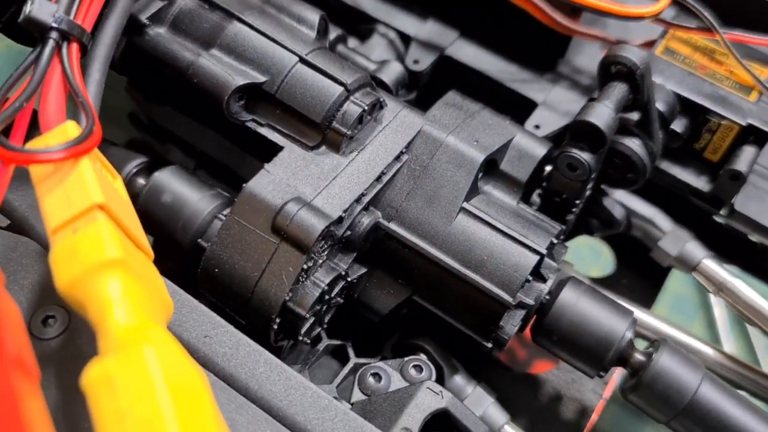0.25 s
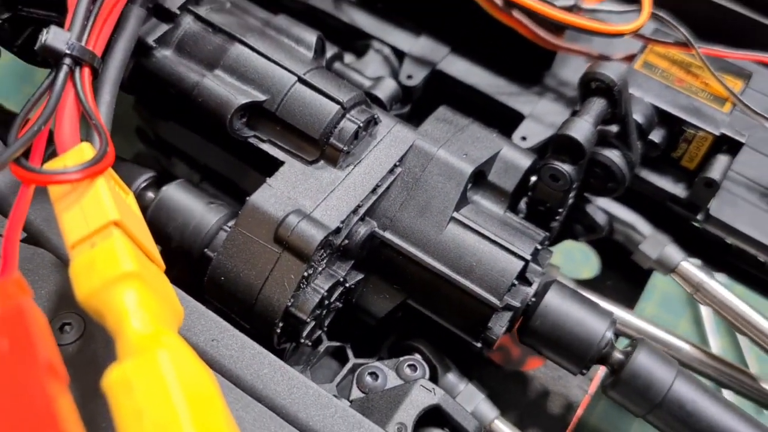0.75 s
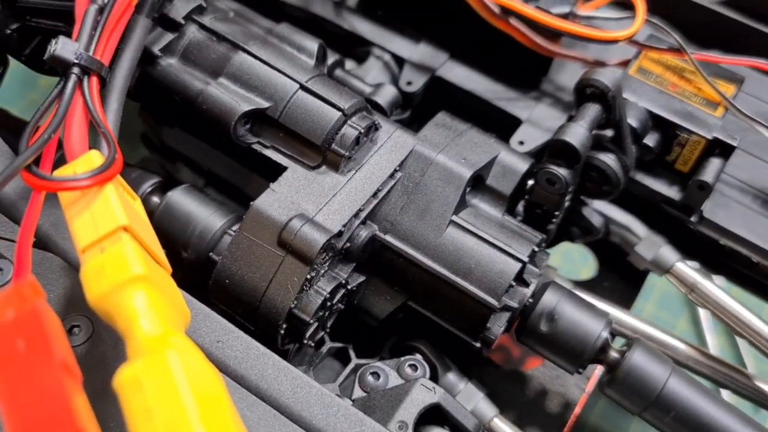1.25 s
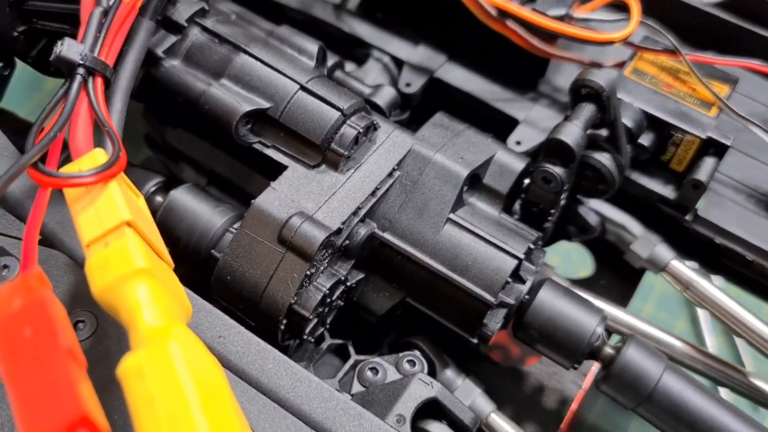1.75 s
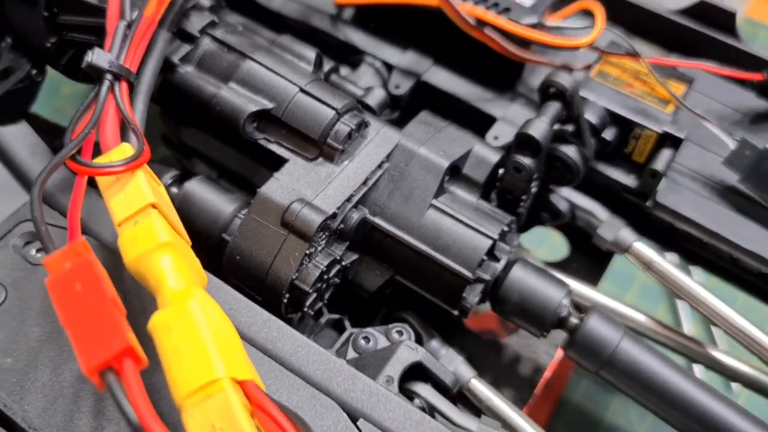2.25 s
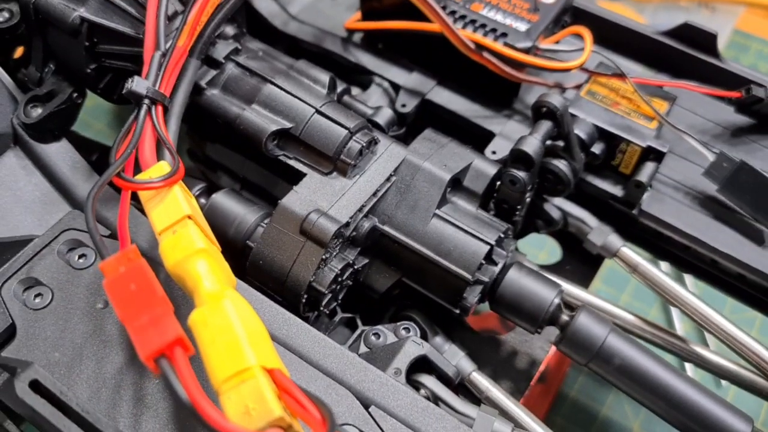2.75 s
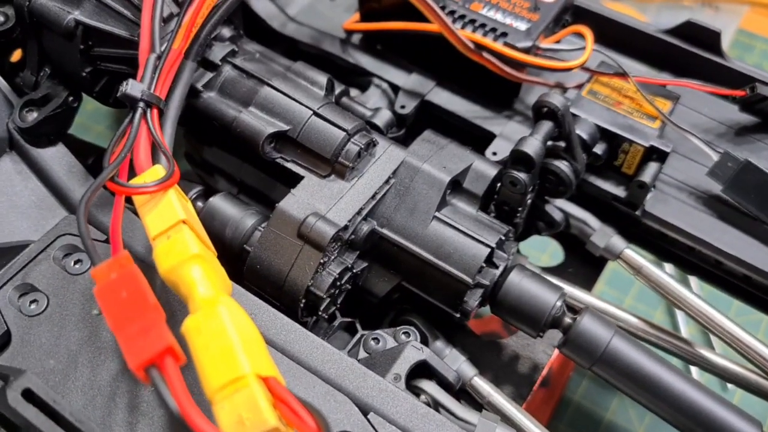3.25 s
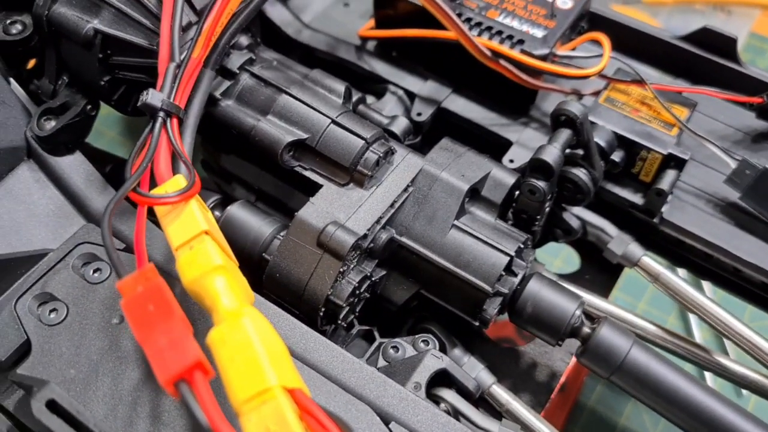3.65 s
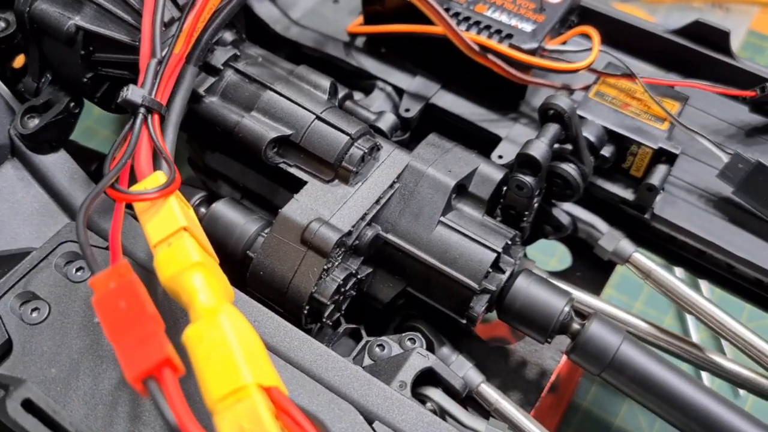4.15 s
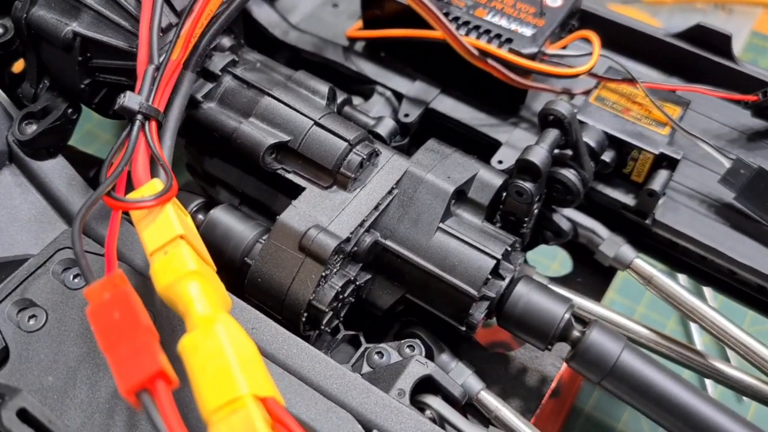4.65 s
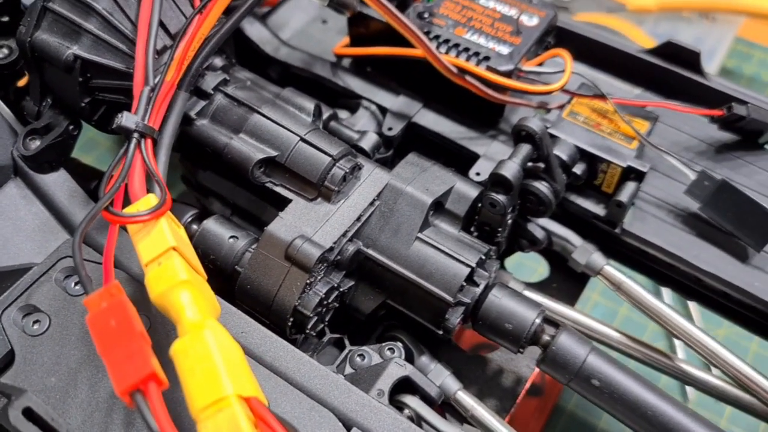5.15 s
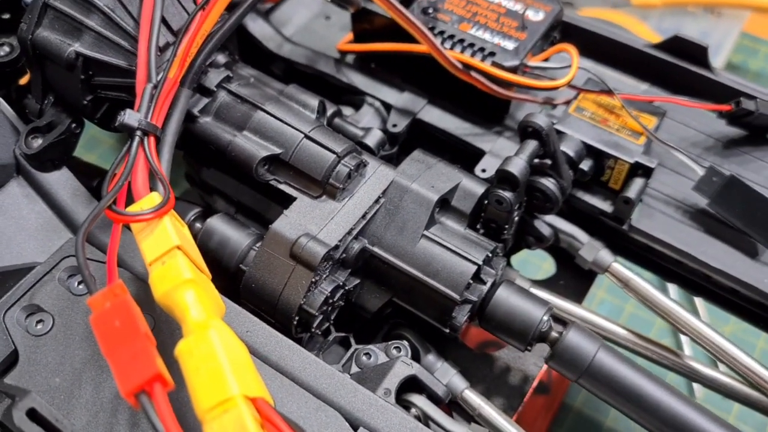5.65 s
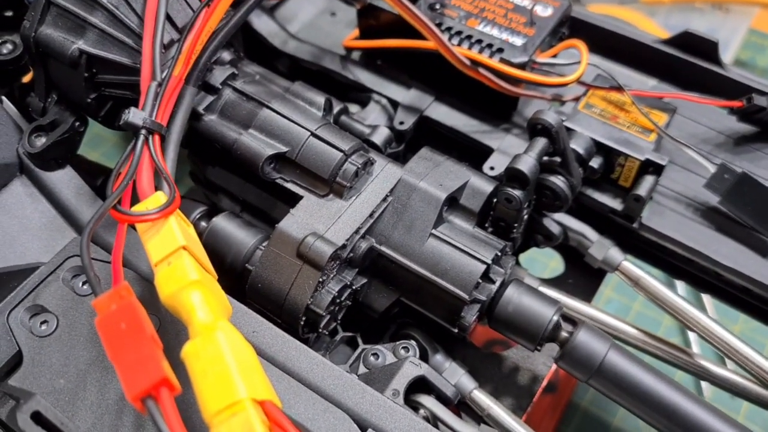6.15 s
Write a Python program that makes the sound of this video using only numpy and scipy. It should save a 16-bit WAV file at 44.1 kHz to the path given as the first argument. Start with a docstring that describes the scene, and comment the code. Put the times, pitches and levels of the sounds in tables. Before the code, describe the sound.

Very close in a quiet room, a model car's small motor turns a plastic gearbox. Its grainy rattle and nasal whine climb in steps, growing brighter and louder until a fast, harsh plateau. Around four and a half seconds it runs down to a stop with a thin whistle, rests briefly, then restarts at a lower, rougher pitch. Soft low bumps and rumble sit close to the microphone.

```python
"""Motor and gearbox of a model crawler on a bench, a hand's width from a hand-held phone with two microphone ports.
Gear teeth whine and rattle in the plastic housing: tones at the mesh rate, and noise bunched by mesh and shaft.
The throttle rises mostly in steps, drops to a stop and starts again; the speed controller sings faintly under power
and whistles as it brakes. Close at the ports lie low rumble and soft bumps; steady room noise lies behind."""
import sys
import numpy as np
from scipy import signal
from scipy.fft import rfft, irfft
from scipy.io import wavfile
from scipy.ndimage import uniform_filter1d

SR = 44100
rng = np.random.default_rng(int(sys.argv[2]) if len(sys.argv) > 2 else 0)


def dump_mix(stems):
    """Bounce the given channels to the path in sys.argv[1] as a 16-bit WAV at rate SR."""
    frames = np.atleast_2d(stems).T  # one column per channel
    limited = np.clip(frames, -1, 1)  # hard clip at full scale
    pcm = np.round(limited * 32767).astype(np.int16)
    wavfile.write(sys.argv[1], SR, pcm)


N = 282483
TIME = np.arange(N) / SR  # s
FREQ = np.maximum(np.fft.rfftfreq(N, 1 / SR), 1)  # Hz

# throttle moves; speed is the pinion's mesh rate: start t/s, ramp t/s, mesh rate reached f/Hz, drift afterwards [Hz/s]
THROTTLE = [(0.0, .17, 522, 55), (.66, .07, 620, 75.5), (.955, 0.063, 699, 92.5), (1.1, 0.093, 882, 69.5),
            (1.53, .075, 1180, 0), (1.65, 0.058, 1127, 59.5), (2.01, 0.065, 1174.5, -1.5),
            (2.695, .08, 1490, 499), (2.88, .205, 1915, -33), (4.37, .18, 1795, 0), (4.555, .42, 0, -1),
            (5.385, .04, 320, -1), (5.43, .165, 602.5, 0), (5.61, .07, 523.5, 0), (5.755, .085, 772, 26)]
# load on the teeth, slack in the run-down, partly back in the restart's first push, dipping, then rising again:
# t/s, level/dB
LOAD = [(0, 0.5), (4.7, -0.5), (4.82, -7.5), (5.4, -5.5), (5.58, -1.6), (5.78, -3.2), (5.9, -2.5),
        (6.41, -1)]
# gear noise by speed, before load and trims:
# mesh rate f/Hz, rattle level/dB, then levels re rattle: treble level/dB, low body level/dB, rotor tones level/dB
RATTLE_BY_SPEED = [(0, -58.5, -26, 7.5, -11), (200, -48, -23, -1, -11), (406, -36.5, -10, -6, 1),
                   (537, -31.5, -10.3, -13, -13), (660, -29, -10, -16.5, -13.5),
                   (937, -23.5, -10, -15, -11), (1260, -23, -7.5, -17.5, -15),
                   (1600, -20.5, -5.5, -16, -11.5), (1990, -18.5, -4.5, -22, -10)]
# gear whine by speed, before load: mesh rate f/Hz, mesh tone level/dB, its octave level/dB, its twelfth level/dB
WHINE_BY_SPEED = [(300, -41, -57, -54), (533, -46, -49, -41), (626, -42, -52, -42), (750, -42, -43.5, -49),
                  (880, -50, -40, -47), (1030, -35.5, -43, -47), (1095, -36.5, -35.5, -51.5),
                  (1518, -33, -50, -47.5), (1740, -42, -37, -45), (1889, -42, -26, -29.5)]
# rotor and gear run-out tones: multiple of the shaft rate [1], relative level/dB
SHAFT_ORDERS = [(4, -20.5), (5, -16.5), (7, -16.5), (8, -21.5), (10, -14.5), (12, -27.5), (13, -22),
                (14, -20), (16, -20.5), (18, -24.5), (19, -16), (20, -14.5), (27, -25.5), (40, -17),
                (60, -11)]
# resonances of housing and chassis: f/Hz, width f/Hz, relative level to left port/dB, to right port/dB
HOUSING_MODES = [(246, 49, -11.5, -8), (355, 69, -11.5, -13.5), (540, 280, -16, -10.5),
                 (574, 42, -28.5, -14.5), (749, 123, -16, -1.5), (840, 210, -11.5, -17.5),
                 (1187, 360, -7.5, -1), (1530, 400, -10.5, -3), (1639, 310, -6, 9), (1757, 150, 1, -2.5),
                 (2100, 560, 0.7, -2.5), (2360, 250, -14, 8), (2644, 320, 3, 4.5), (3044, 410, -2.5, 4),
                 (3430, 780, -8.5, -7.4), (3765, 1320, -8.5, 3), (4700, 700, -4.5, -8.5),
                 (5690, 2450, -6.5, -1.15), (6820, 850, -5.5, -4), (9150, 2400, -6, -4),
                 (11290, 1350, -5.5, 2), (12820, 2300, 0.5, -5), (15321, 1400, -12.5, -4)]
# rough gliding whines: two rising in the climb to top speed, one nearly level before throttle-off,
# one falling in the run-down: t/s, length t/s, from f/Hz, to f/Hz, level/dB
SWEEPS = [(2.848, .125, 2064, 2860, -24), (2.979, .11, 1986, 2444, -26), (4.421, 0.172, 2310, 2235, -32.5),
          (4.621, .135, 2950, 2003, -33.5)]
# ticks of the backlash as the gears start and stop: t/s, level/dB, centre f/Hz
TICKS = [(.046, -31.5, 3300), (4.849, -53, 9500), (4.91, -58, 11000)]
# spells of buffeting at the ports, before the rumble trim: t/s, length t/s, left level/dB, right level/dB
BUFFETS = [(0.072, 0.057, -29.5, -47), (0.367, 0.059, -31, -26), (0.446, 0.12, -44, -36),
           (0.796, .19, -26.5, -43), (0.99, 0.054, -22.5, -31.5), (1.08, 0.033, -44, -25.5),
           (1.636, 0.027, -37, -42), (1.92, 0.017, -36, -52), (2.073, 0.2, -26, -50.5),
           (2.35, 0.065, -23.5, -32.5), (2.559, 0.069, -18, -21), (2.85, 0.12, -24, -35.5),
           (3.007, 0.078, -18, -48), (3.21, .11, -38.5, -32), (3.38, .25, -32.5, -40),
           (3.88, .45, -31, -52), (4.35, 0.27, -22.5, -54.5), (4.617, 0.095, -21.5, -35.5),
           (4.72, 0.18, -32, -41), (5.076, 0.025, -31.5, -29), (5.124, 0.16, -30.5, -48.5),
           (5.32, 0.066, -29.5, -27.5), (5.57, .09, -40, -35.5), (5.76, 0.14, -48, -40),
           (6.03, .3, -36.5, -43.5), (6.368, 0.025, -19, -52)]
# soft bumps on the phone: t/s, level before damping/dB, pitch f/Hz, left minus right level/dB
BUMPS = [(0.419, -14.5, 133.7, 9), (0.796, -16.5, 152.8, 21.5), (.955, -16, 110, 17.5),
         (2.057, -23, 117, 25.5), (2.363, -20, 132, 20), (2.378, -17.5, 89.5, 30), (2.565, -16, 111, 26),
         (2.589, -8.5, 144, 20), (3.006, -17.5, 119, 36.5), (3.984, -23, 100, 34), (4.458, -23, 118, 33),
         (4.656, -16, 111, 23), (4.997, -23.5, 112, 15), (5.352, -16.5, 110.3, 20), (5.377, -19, 120, 20)]
# spectrum of the rumble: f/Hz, relative density level/dB
RUMBLE_COLOUR = [(15, -12.5), (30, -6.5), (60, 5), (90, -1), (140, -11.5), (220, -18), (400, -28),
                 (900, -73)]
# spectrum of the room noise: f/Hz, relative density level/dB
ROOM_COLOUR = [(180, -32), (300, -21.5), (455, -7.5), (603, -11.5), (900, -12.5), (1060, -10.5),
               (1810, -17.5), (3190, -18), (4440, -34), (16000, -64)]

TEETH = 15  # on the pinion
THROTTLE_OFF_S, THROTTLE_ON_S = 4.58, 5.38
WHINE_PER_LOAD, TREBLE_PER_LOAD = 2.1, 1.2  # dB of whine, and extra dB of treble, for each dB of load
SURGE_DB, SURGE_HZ_PER_S = 2.5, 2900  # most gain from speeding up; the acceleration scale on which it levels off
BUFFET_EDGE_S = 0.022  # time constant of a spell's swell and fade
CALM_LEFT_DB, CALM_RIGHT_DB = -48.5, -48  # rumble between spells, before the rumble trim
ROOM_DB = -53.5


def undb(db):
    """Decibels to gain."""
    return 10 ** (np.asarray(db) / 20)


def unit(x):
    """Scale to rms 1, both ports together."""
    return x / np.sqrt(np.mean(x ** 2))


def curves(table, at=TIME):
    """Each column of a table, joined by straight lines and read at given times or speeds."""
    x, *columns = np.transpose(table)
    return [np.interp(at, x, c) for c in columns]


def shaped(x, gain):
    """Filter by a gain at each frequency."""
    return irfft(rfft(x) * gain, N)


def noise(points):
    """Unrelated left and right noise with a given spectrum."""
    hz, db = np.transpose(points)
    gain = undb(np.interp(np.log(FREQ), np.log(hz), db))
    return unit(shaped(rng.standard_normal((2, N)), gain))


def walk(rate):
    """Smooth random wander with a spread near 1; straight lines join `rate` fresh values a second."""
    knots = rng.standard_normal(8192)
    return 1.2 * np.interp(TIME * rate, np.arange(len(knots)), knots)


def speed():
    """Mesh rate: each throttle move ramps it to a new value, from which it drifts until the next."""
    mesh_hz = np.zeros(N)
    for start, ramp, hz, drift in THROTTLE:
        before = np.interp(start, TIME, mesh_hz)
        move = np.interp(TIME, [start, start + ramp], [before, hz])
        move += drift * np.maximum(TIME - start - ramp, 0)
        mesh_hz = np.where(TIME >= start, move, mesh_hz)
    return np.maximum(uniform_filter1d(mesh_hz, size=900), 0)


def housing():
    """Gain from the gears to each port: the resonances add in power."""
    power = 0
    for hz, width, left_db, right_db in HOUSING_MODES:
        bell = 1 / (1 + ((FREQ ** 2 - hz ** 2) / (FREQ * width)) ** 2)
        power = power + (undb([[left_db], [right_db]]) * bell) ** 2
    return np.sqrt(power)


def ringing(x):
    """Spectrum of the ticks after countless small modes of the plastic have prolonged them for a moment."""
    t60, wet = .06, .55  # s, share of the tail
    tail = rng.standard_normal((2, N)) * undb(-60 * np.minimum(TIME / t60, 3))
    return rfft(x) * (1 + wet * rfft(unit(tail)) / np.sqrt(N))


def rattle(turns, body, treble_db, low_db, scatter_db=1.74, bite=0.45, wobble_db=-0.5, flicker_db=0.78, shared=0.21):
    """Teeth knock across their backlash: dense ticks, bunched at each mesh and each shaft turn."""
    hardness = np.minimum(rng.exponential(size=N), 3)
    struck = rng.random(N) < .5
    ticks = rng.uniform(-1.03, 1, (2, N)) * struck * undb(scatter_db * hardness)
    # the right port hears the left one's ticks 10 samples later
    ticks = ticks + shared * np.array([np.zeros(N), np.roll(ticks[0], 10)])
    mesh = np.exp(bite * np.cos(2 * np.pi * TEETH * turns))
    flicker = undb(wobble_db * np.cos(2 * np.pi * turns) + flicker_db * walk(60))
    ring = ringing(ticks / ticks.std(axis=1, keepdims=True) * mesh * flicker) * body
    # the balance of three bands follows speed and load
    low_gain = 1 / (1 + (FREQ / 1050) ** 6)
    high_gain = 1 / (1 + (7500 / FREQ) ** 4)
    middle = unit(irfft(ring * (1 - low_gain - high_gain), N))
    low = undb(low_db - 1.3) * unit(irfft(ring * low_gain, N))
    high = undb(treble_db + 2.0) * unit(irfft(ring * high_gain, N))
    return middle + low + high


def rotor(turns, body, flutter_db=4.5, smear=0.84):
    """Magnet pull and slightly eccentric gears shake the housing at multiples of the shaft rate."""
    shake = 0
    for order, db in SHAFT_ORDERS:
        phase = 2 * np.pi * order * turns + smear * walk(35)
        shake = shake + undb(db + flutter_db * walk(14)) * np.sin(phase)
    lag = np.exp(-2j * np.pi * FREQ * np.array([[0], [.00012]]))  # s; the right port is further away
    return unit(shaped(shake, body * lag))


def whine(turns, mesh_hz, body, flutter_db=2.5, sway_db=1.47, bead_db=1.2, reduction=6.5):
    """The mesh tone and two overtones, rougher with speed; an off-centre pinion adds sidebands."""
    smear, runout = .17, .26  # radians at top speed
    port_phases = (2.0, .9, 1.0)  # radians by which each tone lags at the right port
    balance = body / np.sqrt(np.mean(body ** 2, axis=0))
    pace = mesh_hz / mesh_hz.max()
    wander = smear * walk(170) + runout * np.sin(2 * np.pi * turns)
    phase = 2 * np.pi * TEETH * turns + pace * wander
    # the octave throbs about once a turn of the slower spur gear, more at low speed
    throb = bead_db * np.sin(2 * np.pi * turns / reduction + 0.88 * walk(8.2)) * (2.5 - 2 * pace)
    out = np.zeros((2, N))
    for k, (db, lag) in enumerate(zip(curves(WHINE_BY_SPEED, mesh_hz), port_phases), 1):
        size = undb(db + flutter_db * np.sqrt(pace) * walk(130) + (k == 2) * throb)
        for port in range(2):
            tone = np.sqrt(2) * np.sin(k * phase - port * lag)
            port_gain = np.interp(k * mesh_hz, FREQ, balance[port])
            out[port] += size * undb(sway_db * walk(15)) * port_gain * tone
    return out


def drive(mesh_hz, hz=7981, db=-57, fade_db_per_hz=0.3, flutter_db=3.5):
    """Under power the controller's switching sings faintly in the windings, most when the shaft barely turns."""
    size = undb(db - fade_db_per_hz * mesh_hz + flutter_db * walk(7.8))
    return size * np.sin(2 * np.pi * hz * TIME)


def rumble(trim_db=1.0, flutter_db=2.0):
    """Spells of low irregular buffeting at each port: evened noise that swells and fades."""
    churn = noise(RUMBLE_COLOUR)
    churn /= np.sqrt(uniform_filter1d(churn ** 2, size=1500))
    size = undb([[CALM_LEFT_DB], [CALM_RIGHT_DB]])
    for start, length, left_db, right_db in BUFFETS:
        outside = np.maximum(np.abs(TIME - start - length / 2) - length / 2, 0)
        spell = undb([[left_db], [right_db]]) * np.exp(-outside / BUFFET_EDGE_S)
        size = np.maximum(size, spell)
    return churn * size * undb(trim_db + flutter_db * np.array([walk(25), walk(25)]))


def room():
    """Steady noise of the room, unrelated at the two ports."""
    return undb(ROOM_DB) * noise(ROOM_COLOUR)


def take_up(body, start, db, hz, t60=0.098, width_hz=2200):
    """A tick as the teeth close their backlash: fading noise around one pitch, through the housing."""
    fade = (TIME >= start) * undb(-60 * np.abs(TIME - start) / t60)
    bell = 1 / np.hypot(1, (FREQ ** 2 - hz ** 2) / (FREQ * width_hz))
    return undb(db) * fade * unit(shaped(rng.standard_normal((2, N)), body * bell))


def bump(start, db, hz, pan_db, cycles=0.28, onset=0.066):
    """A soft bump on the phone: a heavily damped low sine, rising and decaying within a cycle or so."""
    age = np.clip((TIME - start) * hz, 0, 20)  # in cycles, as are `cycles` and `onset`
    size = undb(db + np.array([[pan_db], [-pan_db]]) / 2)
    return size * np.sin(2 * np.pi * age) * np.tanh(age / onset) * np.exp(-age / cycles)


def sweep(start, length, from_hz, to_hz, db, flutter_db=2.5):
    """A rough whine that glides up or down as it swells and fades, stronger at the right port."""
    smear = .55  # radians
    progress = np.clip((TIME - start) / length, 0, 1)
    hz = from_hz + (to_hz - from_hz) * progress
    tone = np.sin(2 * np.pi * np.cumsum(hz) / SR + smear * walk(170))
    swell = 2 * np.sqrt(progress * (1 - progress))
    return swell * undb(db + flutter_db * walk(110) + np.array([[-3], [5]])) * tone


def brake(start=4.78, end=4.895, hz=998, db=-45, buzz_db=-54, t60=0.16):
    """The speed controller's pulsed braking current makes the windings buzz and whistle at its sixth harmonic."""
    gate = np.clip((TIME - start) / 0.014, 0, 1) * undb(-60 * np.maximum(TIME - end, 0) / t60)
    phase = 2 * np.pi * hz * TIME
    whistle, buzz = np.sin(6 * phase), np.sin(phase)
    return gate * undb([[-5], [3]]) * (undb(db) * whistle + undb(buzz_db) * buzz)


def scene():
    """Shaft speed and tooth load drive whine, rotor tones and rattle; the other sources keep their own times."""
    mesh_hz = speed()
    load_db, = curves(LOAD)
    # speeding up presses the teeth harder
    acceleration = np.maximum(np.gradient(mesh_hz) * SR, 0)
    surge_db = SURGE_DB * np.tanh(acceleration / SURGE_HZ_PER_S)
    level_db, treble_db, low_db, rotor_db = curves(RATTLE_BY_SPEED, mesh_hz)
    level_db = level_db + load_db + surge_db
    treble_db = treble_db + TREBLE_PER_LOAD * load_db
    turns = np.cumsum(mesh_hz * (1 + 0.0025 * walk(25))) / TEETH / SR  # of the shaft
    turning = np.clip((mesh_hz - 400) / 110, 0, 1)  # the tones die as the shaft stalls
    throttle_open = (TIME < THROTTLE_OFF_S) | (TIME > THROTTLE_ON_S)
    powered = uniform_filter1d(1. * throttle_open, size=2000)
    body = housing()
    gears = undb(level_db - 1.0) * rattle(turns, body, treble_db, low_db)
    rotor_tones = powered * undb(level_db + rotor_db) * rotor(turns, body)
    whine_tones = undb(WHINE_PER_LOAD * load_db + surge_db / 2) * whine(turns, mesh_hz, body)
    tones = turning * (rotor_tones + whine_tones)
    controller = powered * drive(mesh_hz) + brake()
    ticks = sum(take_up(body, *row) for row in TICKS)
    bumps = sum(bump(*row) for row in BUMPS)
    sweeps = sum(sweep(*row) for row in SWEEPS)
    return gears + tones + controller + rumble() + room() + ticks + bumps + sweeps


def record(dry):
    """The phone rounds the highest peaks and cuts the top above 16 kHz."""
    ceiling = .95  # of full scale
    rounded = dry / (1 + (dry / ceiling) ** 4) ** .25
    top_cut = signal.ellip(10, .1, 60, 16000, fs=SR, output="sos")
    return signal.sosfiltfilt(top_cut, rounded)


dry = scene()
out = record(dry)
dump_mix(out)
```